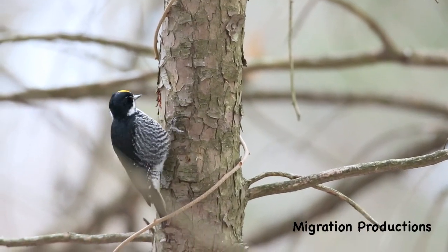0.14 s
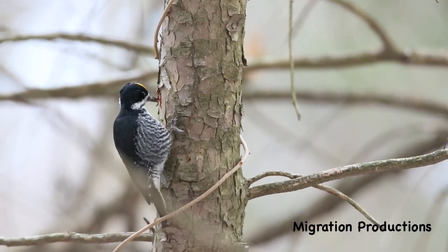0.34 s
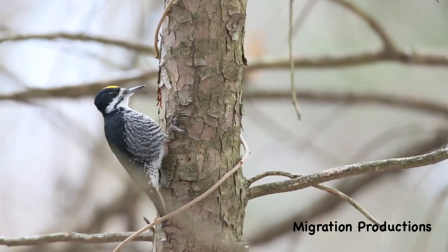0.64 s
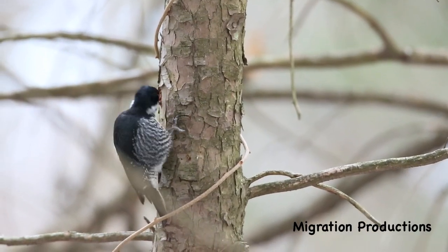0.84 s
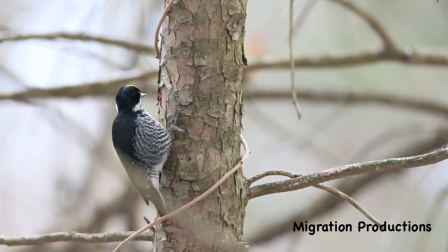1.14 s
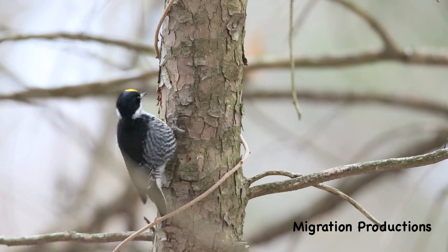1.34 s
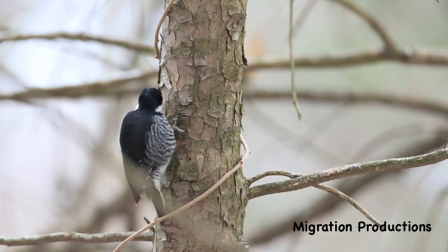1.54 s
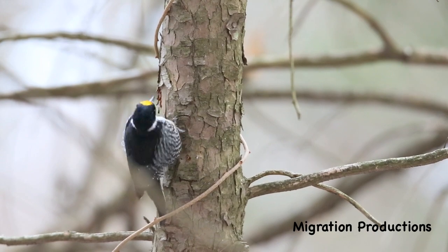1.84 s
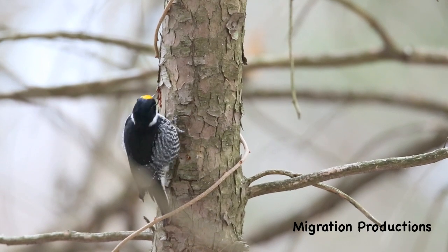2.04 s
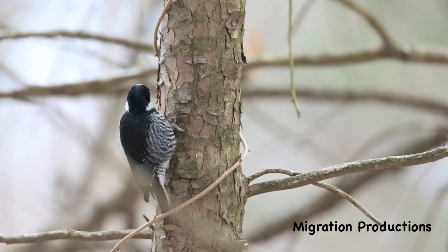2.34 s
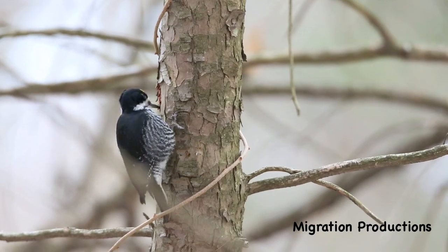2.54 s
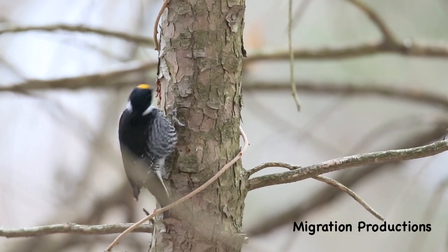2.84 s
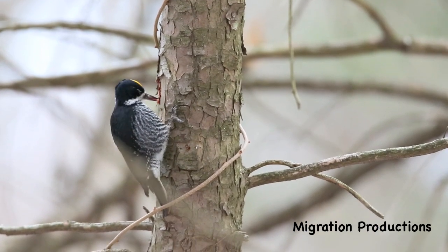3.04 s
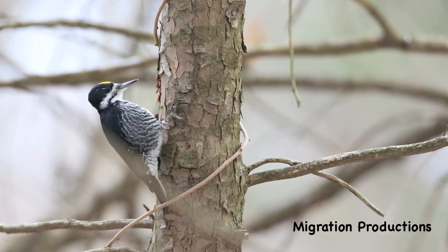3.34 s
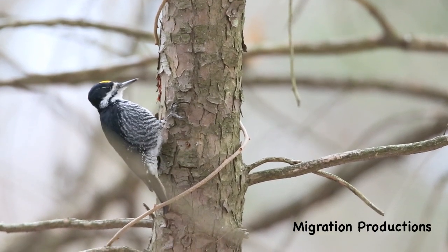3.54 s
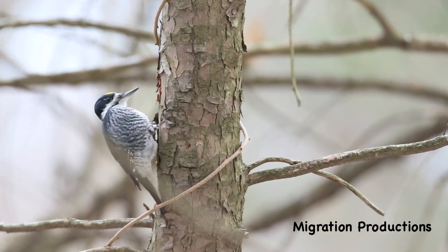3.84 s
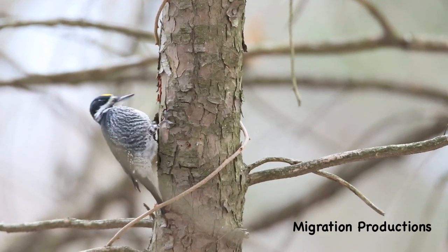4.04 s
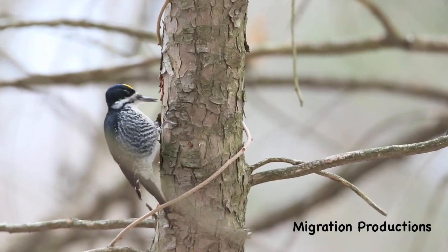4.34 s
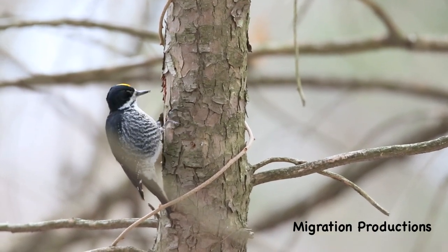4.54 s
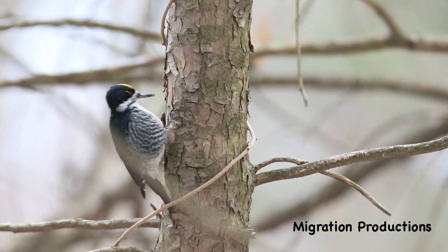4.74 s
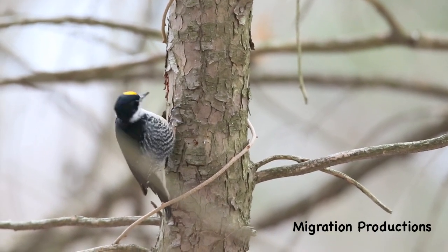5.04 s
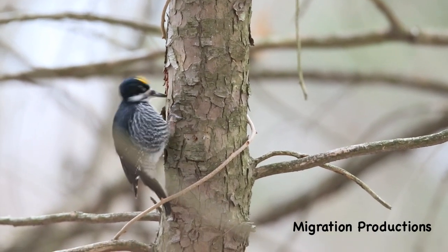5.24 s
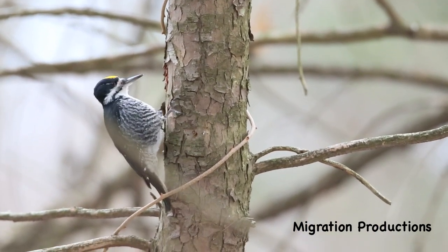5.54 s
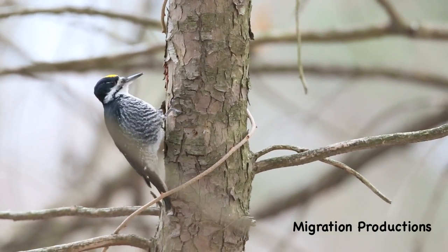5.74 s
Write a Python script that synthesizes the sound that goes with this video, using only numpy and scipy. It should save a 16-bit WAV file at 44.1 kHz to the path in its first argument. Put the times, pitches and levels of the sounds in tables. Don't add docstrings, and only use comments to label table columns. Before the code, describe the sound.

A six-second outdoor scene in bare woods. Far traffic forms a soft, deep rumble and tyre roar, nearly steady, a little fuller from about 4 seconds and easing at the end. A thin, constant, very high electronic whine, near 7.8 kHz, sits over faint hiss. A woodpecker picks at flaky bark: short, bright, dry ticks with a brief woody ring and faint trunk echoes. They fall irregularly, a clear one at 0.15, very faint ones around 1 and 1.5, clearer ones at 1.65, 2.0, 2.25 and a tight double at 2.65. Light pecks and a dull low knock come at 3.0, more taps at 3.9 and 4.2. From 4.7 to 5.2 a close camera whirs and rattles, firing four evenly spaced double clacks, about ten frames a second, each preceded by a dull knock. Faint pecks at 5.2 to 5.4 follow, then only traffic, whine and hiss.

```python
import sys
import numpy as np
from scipy import signal
from scipy.fft import irfft
from scipy.io import wavfile
from scipy.ndimage import uniform_filter1d

SR = 44100
rng = np.random.default_rng(int(sys.argv[2]) if len(sys.argv) > 2 else 0)


def decibels_to_gain(level_db):
    exponent = np.asarray(level_db, float) / 20
    return 10 ** exponent


def inscribe(sig):
    pcm = np.round(np.clip(np.atleast_2d(sig).T, -1, 1) * 32767)
    wavfile.write(sys.argv[1], SR, pcm.astype(np.int16))


N = 260190

# ring_hz [Hz], width_hz [Hz]
BARK = [
    (5780, 480),
    (3140, 400),
    (4880, 500),
    (6750, 600),
    (8800, 1000),
]


def evened(x):
    return x / np.sqrt(np.mean(x ** 2) + 1e-20)


def peaked(x):
    return x / abs(x).max()


def read(points, hz):
    f, value = np.transpose(points)
    return np.interp(np.log(hz + 1), np.log(f + 1), value)


def curve(rows):
    time_s, level_db = np.transpose(rows)
    return np.interp(np.arange(N) / SR, time_s, level_db)


def ring(x, hz, width):
    return signal.lfilter(*signal.iirpeak(hz, hz / width, SR), x)


def noise(shape, patchy_db):
    frames, hz = N // 512 + 5, np.fft.rfftfreq(2048, 1 / SR)
    a, b, patches = rng.standard_normal((frames, 1025, 3)).T
    patches = uniform_filter1d(patches, size=14, axis=0)
    patches = evened(uniform_filter1d(patches, size=10, axis=1))
    z = (a + 1j * b) * decibels_to_gain(shape(hz)[:, None] + patchy_db * patches)
    return evened(signal.istft(z, nperseg=2048, noverlap=1536)[1][:N])


def strike(grit, length_ms):
    u = np.arange(len(grit)) / SR * 1000 / length_ms
    return grit * u * np.exp(-u)


def place(s, sound):
    track, start = np.zeros(N + len(sound)), round(s * SR)
    track[start:start + len(sound)] = sound
    return track[:N]


def engine_hum(hz, width):
    wavering = evened(ring(ring(rng.standard_normal(N), hz, width), hz, width))
    return evened(ring(np.tanh(1.7 * wavering), hz, 3 * width))


def traffic():
    # frequency_hz [Hz], density_db [dB per Hz]
    road = [(13, -46), (22, -17), (76, 7), (153, -2), (198, 0), (289, -1.5), (326, -3.5), (423, -4.5),
            (570, -3), (1040, -8), (1120, -9), (1600, -13), (2260, -28.5), (2600, -28), (3380, -77),
            (5720, -120)]
    # time_s [s], level_db [dB]
    swell = [
        (0, -45.5),
        (1.4, -46.5),
        (2.3, -46.5),
        (2.7, -46),
        (3.3, -46),
        (4.1, -44),
        (5.3, -44.5),
        (5.9, -49),
    ]
    # pitch_hz [Hz], width_hz [Hz], level_db [dB]
    drones = [
        (84.6, 32, -56),
        (331, 4.7, -60.5),
    ]
    swell_db = curve(swell) + 45

    def share_db(hz, sign):
        return -10 * np.log10(1 + ((hz + 1) / 190) ** (4 * sign))

    deep = noise(lambda hz: read(road, hz) + share_db(hz, 0.79), 0.23)
    roar = noise(lambda hz: read(road, hz) + share_db(hz, -1.01), 0.56)
    hums = sum(decibels_to_gain(db) * engine_hum(hz, width) for hz, width, db in drones)
    return deep * decibels_to_gain(-52 + 1.3 * swell_db) + roar * decibels_to_gain(-47 + 0.14 * swell_db) + hums


def electronics():
    # frequency_hz [Hz], density_db [dB per Hz]
    hiss_points = [(1500, -7.5), (2500, -3.5), (3400, -4), (4500, -5.5), (6000, -6), (7500, -6.5),
                   (9000, -6), (10400, -8.5), (11400, -9.5), (11900, -6), (12400, -10.5), (13500, -8.5),
                   (15700, -15.5), (16200, -60)]
    # time_s [s], level_db [dB]
    whine_points = [
        (0.0, -52),
        (0.23, -53),
        (0.3, -54),
        (0.56, -51.5),
        (1.02, -52.5),
        (1.84, -51),
        (2.14, -49),
        (2.4, -50.5),
        (5.7, -49),
        (5.9, -49.5),
    ]
    slips = [5.1333, 5.405, 5.6834]
    whine_hz, slip_s = 7812.5, 2 / 48000
    t = np.arange(N) / SR
    slipped = uniform_filter1d(1. * np.searchsorted(slips, t), size=130)
    turn = 2 * np.pi * (t + slip_s * slipped)
    flutter = uniform_filter1d(uniform_filter1d(rng.standard_normal(N), size=800), size=800)
    whine = decibels_to_gain(curve(whine_points) + 0.44 * evened(flutter)) * np.sin(whine_hz * turn)
    octave = decibels_to_gain(-87) * np.sin(2 * whine_hz * turn)
    stray = decibels_to_gain(-90) * np.sin(2 * np.pi * 15730 * t)
    hiss = noise(lambda hz: read(hiss_points, hz) - 60 * (hz < 1000), 1.0)
    return np.sqrt(2) * (whine + octave + stray) + decibels_to_gain(-66) * hiss


def woods(x):
    # frequency_hz [Hz], t60_s [s]
    decay = [
        (1500, 0.23),
        (4500, 0.29),
        (8000, 0.61),
        (12000, 0.05),
    ]
    taps = np.zeros(SR // 2)
    slots = np.arange(0, len(taps) - 16, 16)
    taps[slots + rng.integers(0, 16, len(slots))] = rng.choice([-1., 1.], len(slots))
    taps *= np.clip((np.arange(len(taps)) / SR * 1000 - 3) / 3.3, 0.3, 1)
    hz, t, z = signal.stft(taps, SR, nperseg=128)
    tail = signal.istft(z * decibels_to_gain(-60 * t / read(decay, hz)[:, None]), SR, nperseg=128)[1]
    return signal.fftconvolve(x, tail / np.linalg.norm(tail))[:N]


def ring_levels(blow_db, flake_hz, hollow_db, snap_db):
    focus = 10.5 + 1.4 * max(-snap_db, 0)
    levels = [blow_db - focus * abs(np.log2(hz / flake_hz)) for hz, width in BARK]
    levels[1], levels[4] = blow_db + hollow_db, blow_db + snap_db
    return levels


def pecks():
    # start_s [s], blow_db [dB], pitch_hz [Hz], hollow_db [dB to blow], snap_db [dB to blow]
    peck_table = [(0.0244, -48.5, 6600, -9.5, -3), (0.1577, -40, 5800, -8.5, 3.5),
                  (0.9577, -62, 4800, -9, -11), (1.511, -58.5, 5500, 1, -11),
                  (1.6621, -44.5, 5040, -18, 0.5), (2.0253, -49.5, 6600, -12, 3),
                  (2.2487, -45, 5400, -6, 4.5), (2.6428, -48, 5470, -9, -30),
                  (2.644, -44.5, 5660, -14, -27), (3, -55.5, 5800, 2, 5), (3.006, -55, 6300, -5, -8),
                  (3.8654, -51, 5500, 6, 4.5), (4.2233, -46.5, 6270, -2, -22), (5.2314, -55.5, 4850, 0, 9),
                  (5.3796, -52, 6900, -6, 5.5), (5.4063, -47.5, 5100, -7, -6), (2.312, -60, 5200, -6, -15),
                  (4.357, -62, 5700, -10, -15)]
    crack_lag_s = .0005
    rings, cracks = np.zeros(N), np.zeros(N)
    chance = rng.standard_normal((len(peck_table), 700))
    for (s, *peck), grit in zip(peck_table, chance):
        levels_db = ring_levels(*peck)
        contact = strike(abs(grit), 0.023) + 0.06 * strike(grit, 0.2)
        crack = ring(ring(contact, 6500, 9300), 7000, 7000)
        crack = signal.lfilter(*signal.butter(4, 11800, fs=SR), crack)
        crack_db = 1.487 * max(levels_db) + 0.32 * min(peck[-1], 0) + 29
        cracks += place(s + crack_lag_s, decibels_to_gain(crack_db) * peaked(crack))
        for (hz, width), db, slip in zip(BARK, levels_db, grit):
            blow = 0.045 * strike(grit, 0.4)
            blow[15 + round(9 * abs(slip))] += 1
            rings += place(s, decibels_to_gain(db + 4) * peaked(ring(ring(blow, hz, 2 * width), hz, width)))
    scattered = woods(decibels_to_gain(-20) * rings + decibels_to_gain(-3.5) * ring(cracks, 7800, 7000))
    return rings + decibels_to_gain(-5) * cracks + scattered


def shutter():
    # start_s [s], level_db [dB]
    wake = [
        (4.6942, -48),
        (4.738, -48),
    ]
    # start_s [s], level_db [dB], pitch_hz [Hz]
    lone_knocks = [
        (3.017, -31, 1420),
        (5.0659, -58, 1460),
    ]
    starts = [4.7657 + k * .0986 for k in range(4)]
    rises = [(s, db, -16) for s, db in wake + [(s, -42) for s in starts]]
    drops = [(s + .0317, -43 if s == starts[-1] else -42.5, -10) for s in starts]
    cocks = [(s - .0514, -36, 1370 + k * 119) for k, s in enumerate(starts)]
    return sorted(rises + drops), lone_knocks + cocks


def camera():
    # frequency_hz [Hz], gain_db [dB]
    body_points = [(900, -18), (1700, -6), (2200, -5.5), (2650, 1), (3050, -6), (3450, 2), (3900, -2),
                   (5000, -5), (6500, -7), (8000, -6), (9300, -12.5), (11000, -22)]
    drive_s = [
        4.69,
        4.78,
        5.102,
        5.2,
    ]
    drive_db = [
        -69,
        -56.5,
        -57,
        -67,
    ]
    t = np.arange(N) / SR
    colour = np.roll(irfft(decibels_to_gain(read(body_points, np.fft.rfftfreq(512, 1 / SR)))), 256)

    def body(x):
        return signal.oaconvolve(x, colour, "same")

    times, knocks = shutter()
    chance = rng.standard_normal((len(times), 900))
    hits = [place(s, decibels_to_gain(db) * evened(strike(grit, 2.3))) for (s, db, box_db), grit in zip(times, chance)]
    box = sum(decibels_to_gain(box_db) * hit for (s, db, box_db), hit in zip(times, hits))
    clacks = decibels_to_gain(-11.5) * body(sum(hits)) + ring(box, 3000, 350)
    for s, db, hz in knocks:
        thud = strike(np.sin(2 * np.pi * hz * t[:900]), 0.96)
        clacks += place(s, decibels_to_gain(db - 9.5) * peaked(thud))
    grains = decibels_to_gain(1.2 * rng.exponential(1, N)) * (rng.random(N) < 7000 / SR) * rng.standard_normal(N)
    running = (t > drive_s[0]) & (t < drive_s[-1])
    rattle = decibels_to_gain(np.interp(t, drive_s, drive_db) - 3.5) * running * evened(body(grains))
    return clacks + decibels_to_gain(-2.0) * woods(clacks) + rattle


def scene():
    return (traffic() + electronics() + pecks() + camera())[None]


def gated(x):
    drop_table = [-27.9, -30, -22.5, -24, -28.6, -31]
    step_table = [-37.5, -28.5, -46, -47, -48, -39]
    n, lead = np.arange(2048) + .5, 2048 - 859
    window = signal.windows.kaiser_bessel_derived(2048, 4 * np.pi)
    basis = window * np.cos(np.pi / 1024 * np.outer(n[:1024], n + 512)) / np.sqrt(512)
    halves = np.pad(x, (lead, 4096 - (N + lead) % 1024)).reshape(-1, 1024)
    lines = np.hstack([halves[:-1], halves[1:]]) @ basis.T
    whine_power = (lines[:, 352:384] ** 2).sum(1)
    whine = np.sqrt(uniform_filter1d(whine_power, size=5))[:, None] + 1e-9
    wander_db = 1.6 * evened(uniform_filter1d(rng.standard_normal(whine.shape), size=2, axis=0))
    for low, drop_db, step_db in zip(range(320, 512, 32), drop_table, step_table):
        band, step = lines[:, low:low + 32], whine * decibels_to_gain(step_db)
        kept = np.linalg.norm(band, axis=1, keepdims=True) > whine * decibels_to_gain(drop_db + wander_db)
        rounded = np.floor(abs(band / step) ** .75 + .4) ** (4 / 3)
        lines[:, low:low + 32] = kept * np.sign(band) * rounded * step
    lines[:, 732:] = 0
    frames = lines @ basis
    return (frames[:-1, 1024:] + frames[1:, :1024]).ravel()[lead - 1024:][:N]


def band_limit(x):
    return signal.sosfilt(signal.butter(12, 15940, fs=SR, output="sos"), x)


def record(dry):
    mix = gated(dry[0])[None]
    return band_limit(mix)


dry = scene()
out = record(dry)
inscribe(out)
```